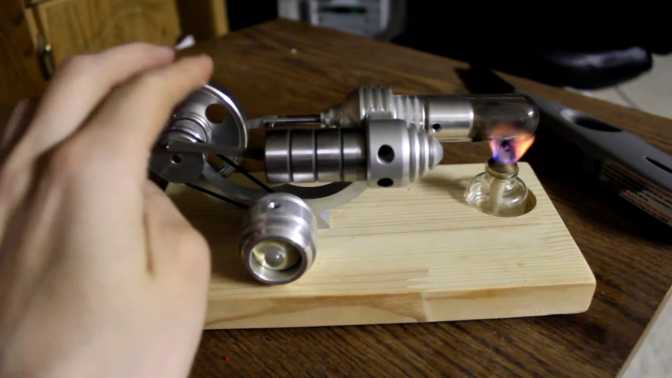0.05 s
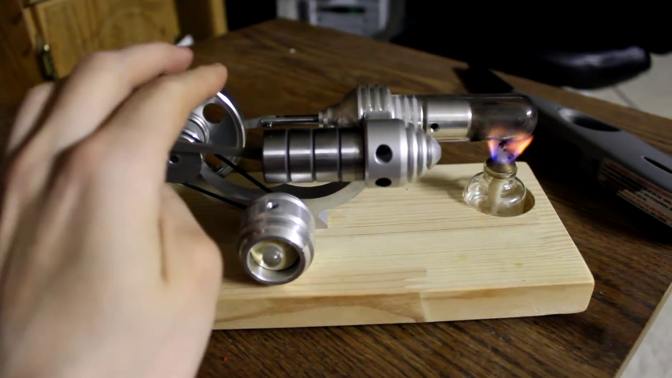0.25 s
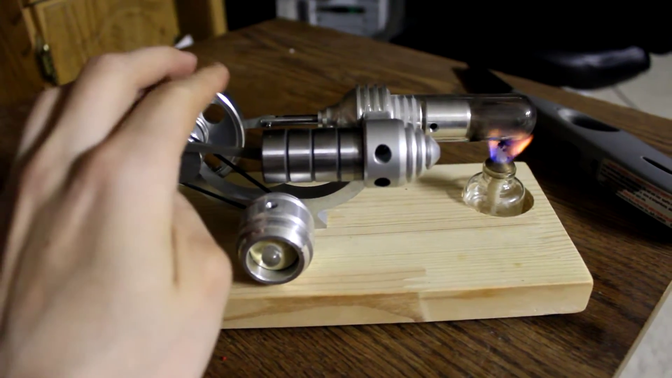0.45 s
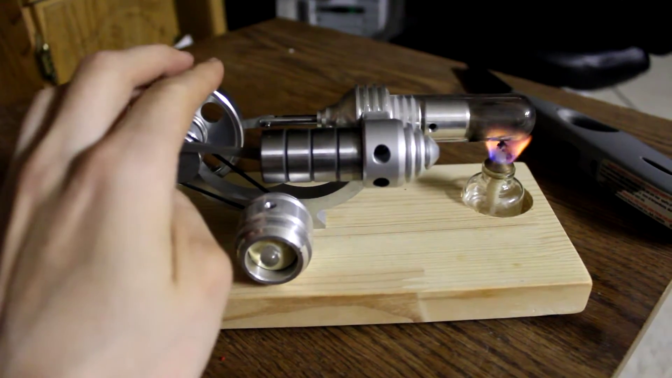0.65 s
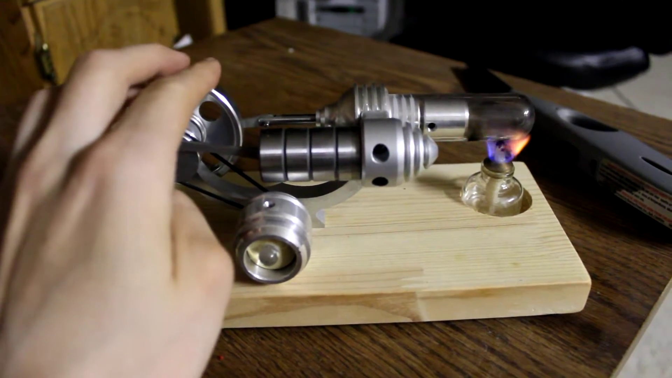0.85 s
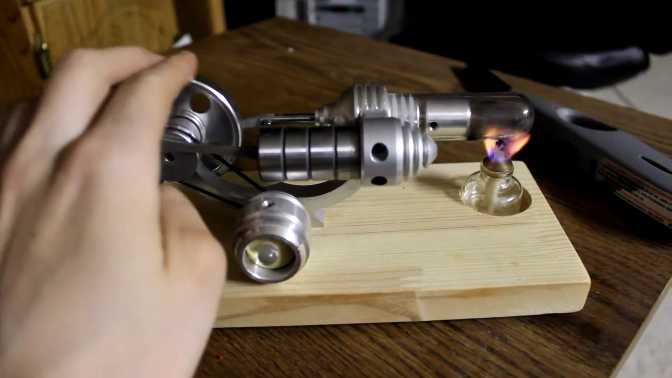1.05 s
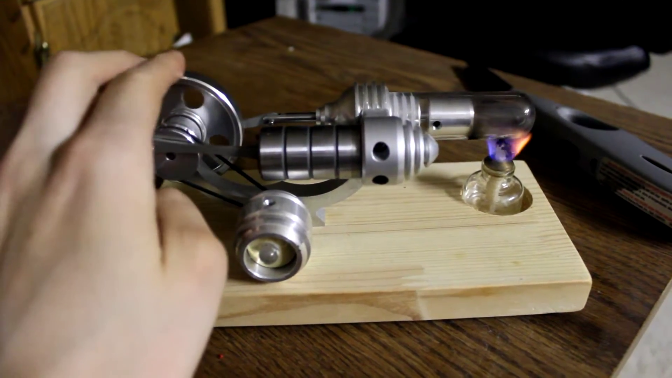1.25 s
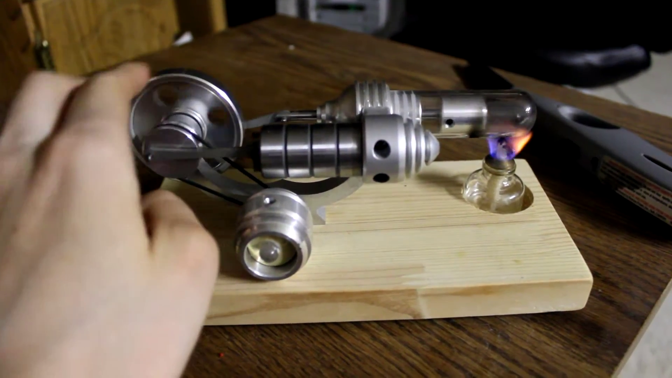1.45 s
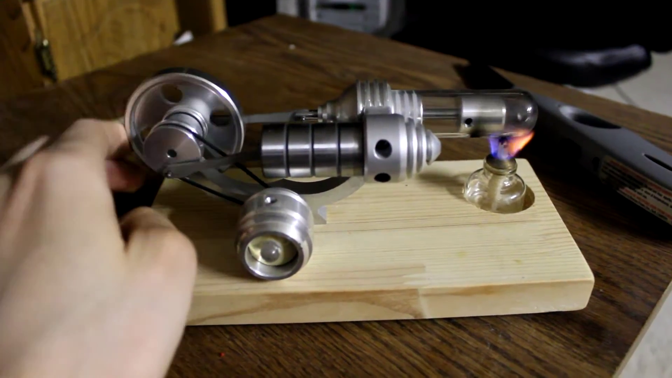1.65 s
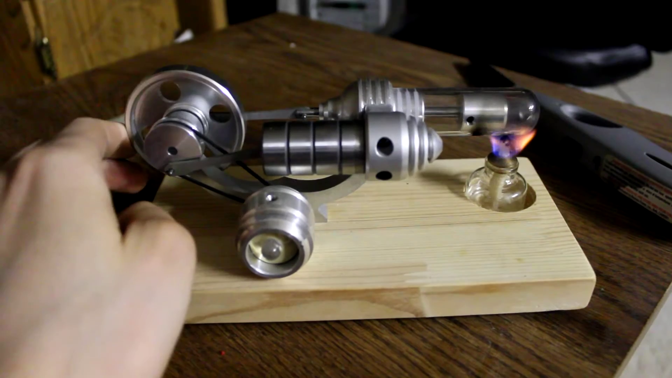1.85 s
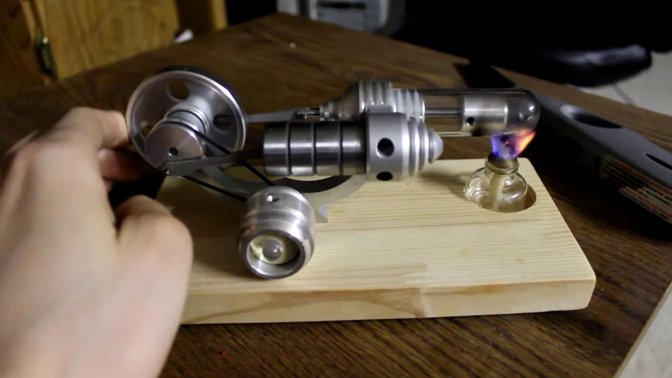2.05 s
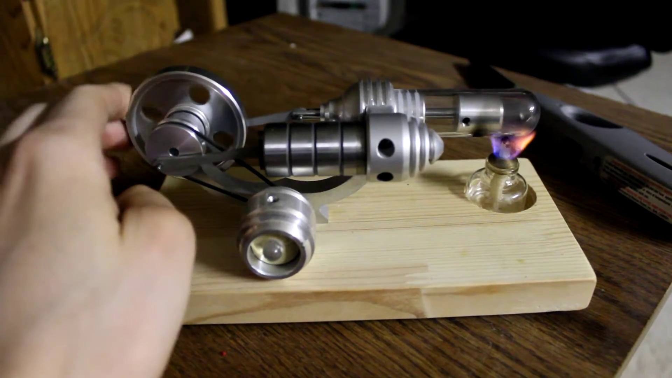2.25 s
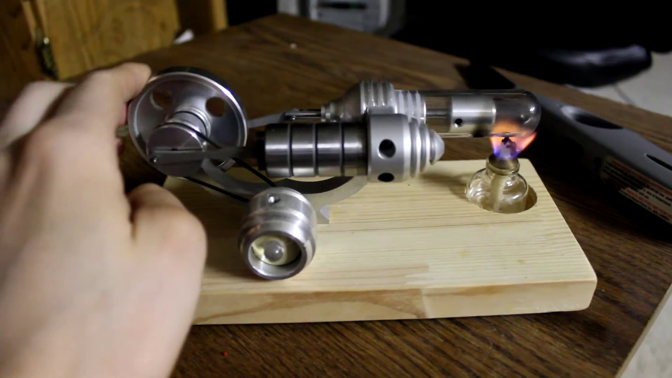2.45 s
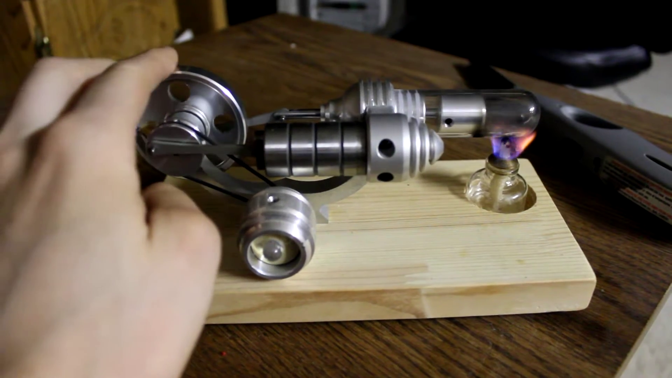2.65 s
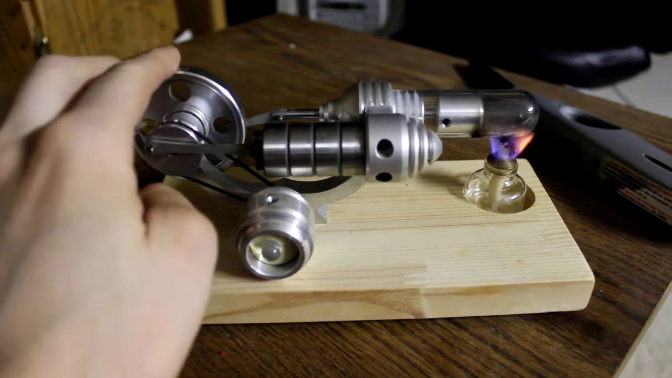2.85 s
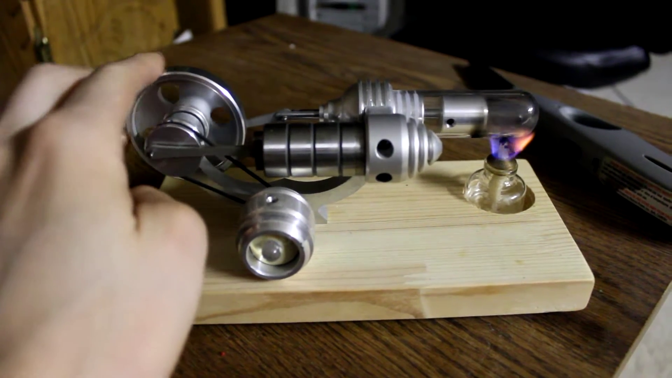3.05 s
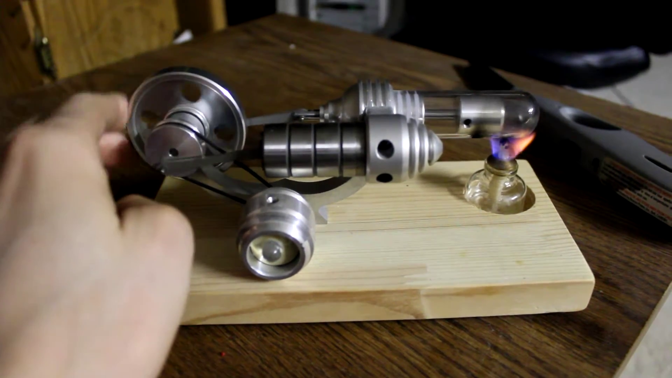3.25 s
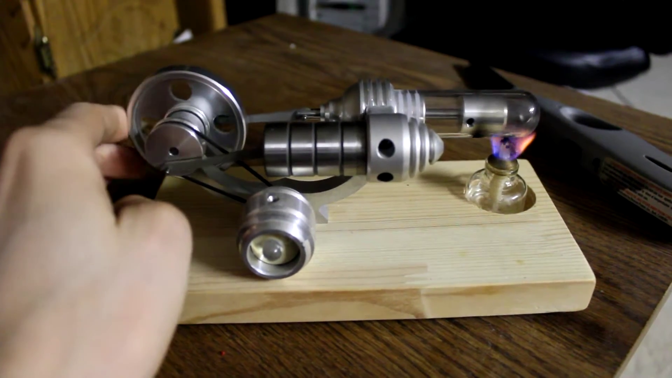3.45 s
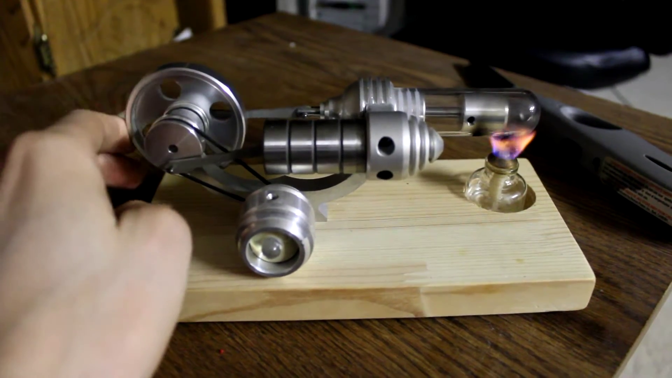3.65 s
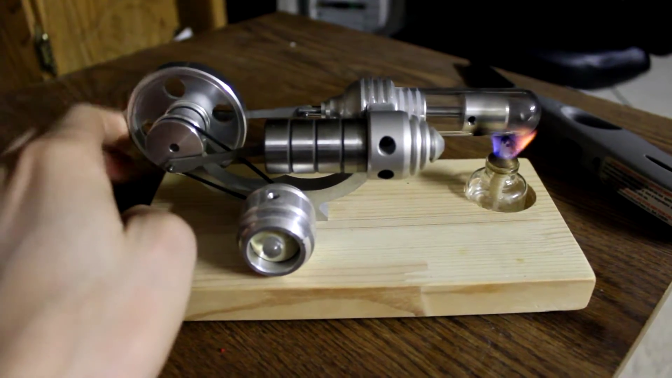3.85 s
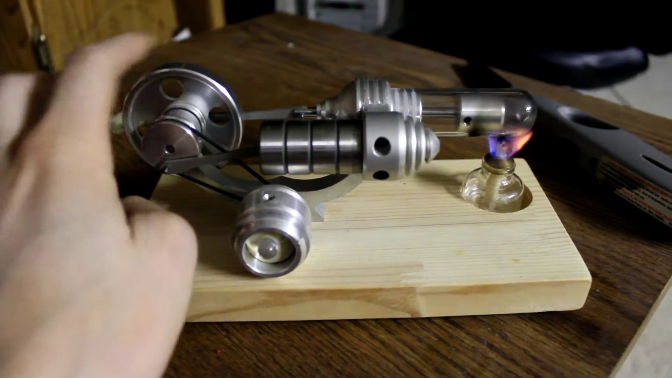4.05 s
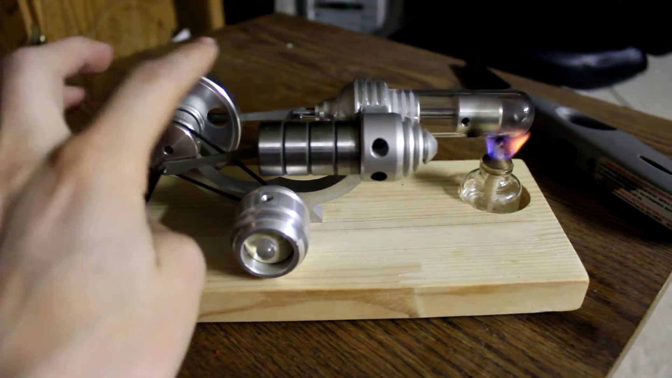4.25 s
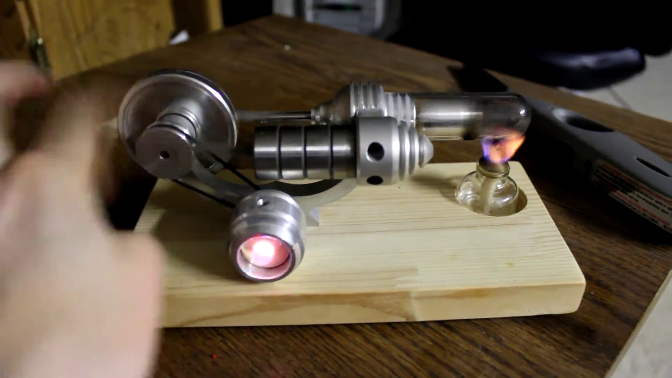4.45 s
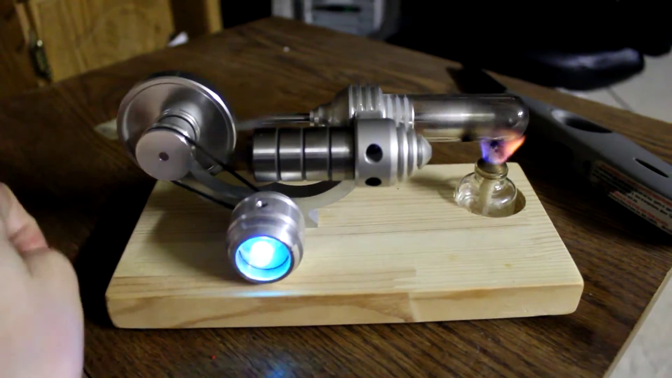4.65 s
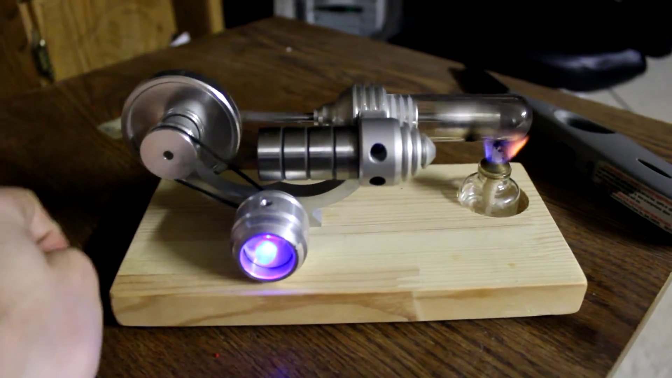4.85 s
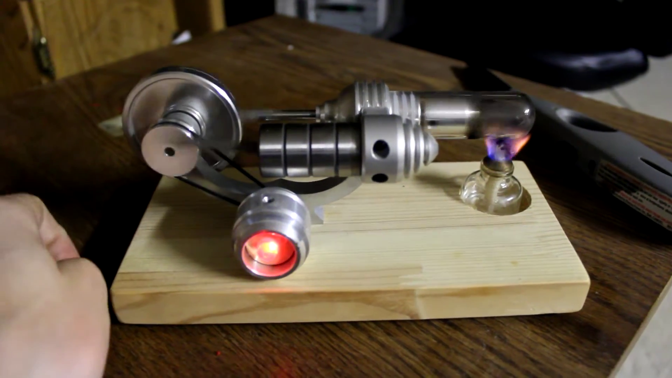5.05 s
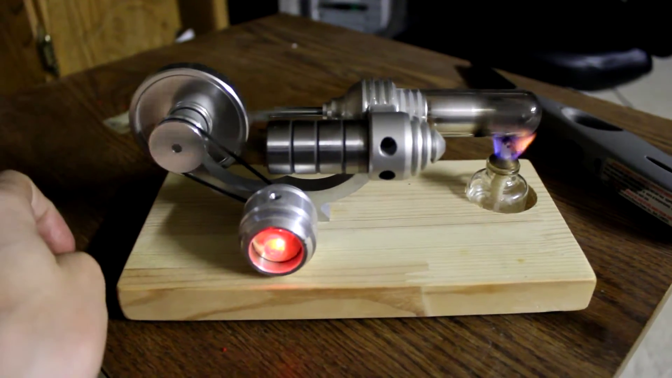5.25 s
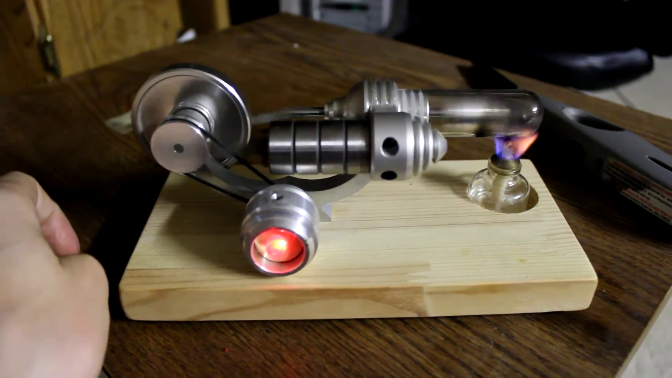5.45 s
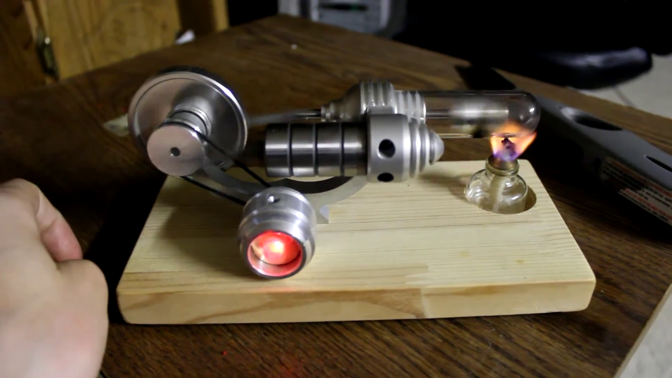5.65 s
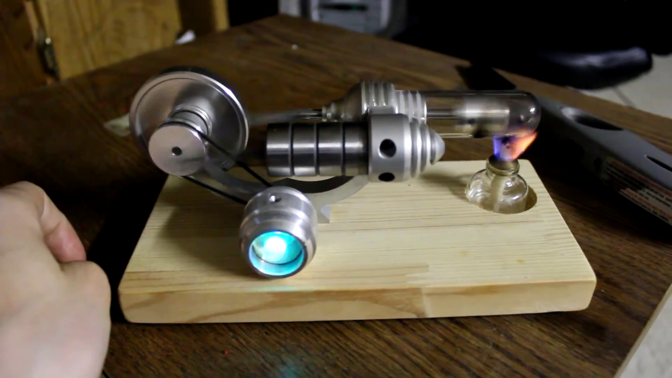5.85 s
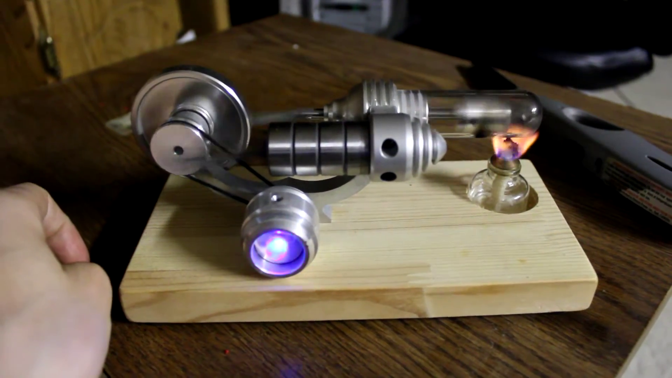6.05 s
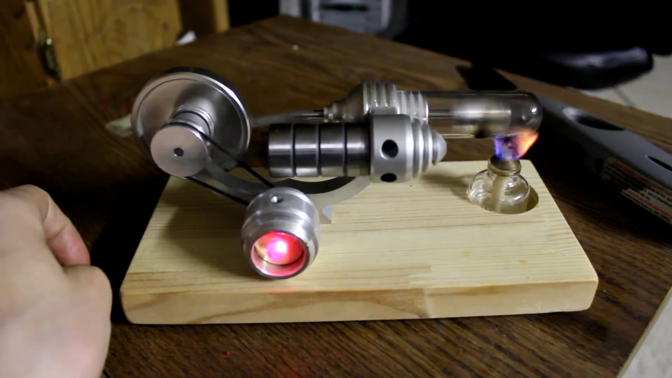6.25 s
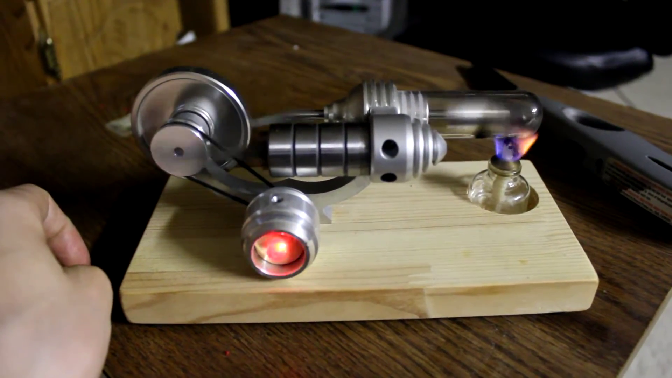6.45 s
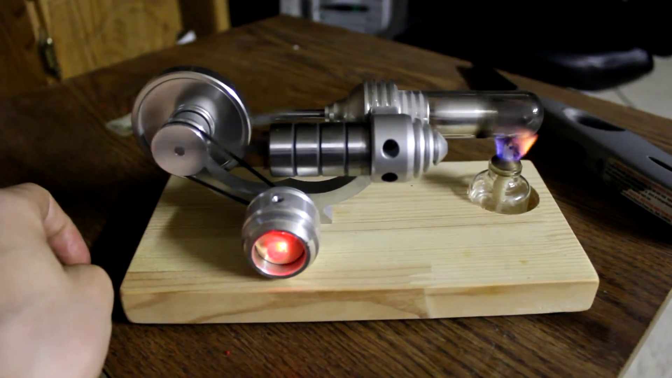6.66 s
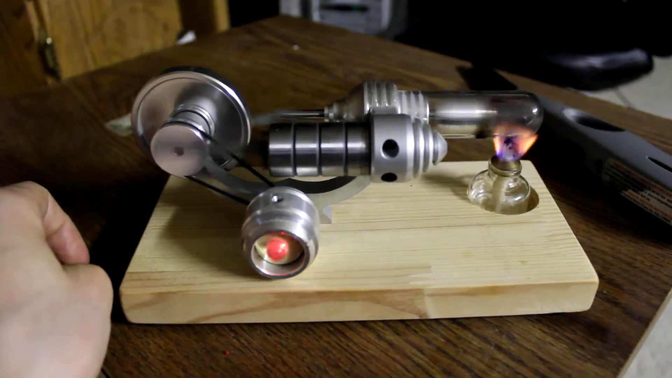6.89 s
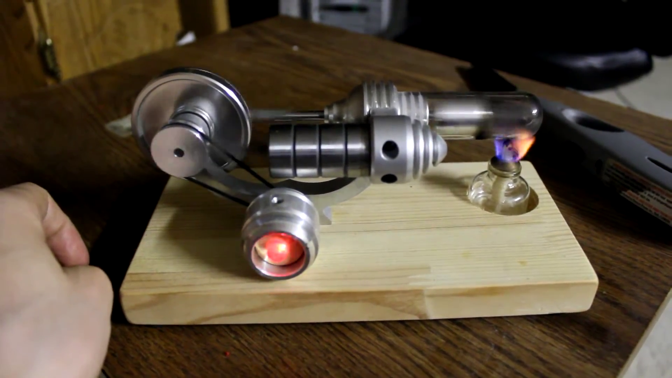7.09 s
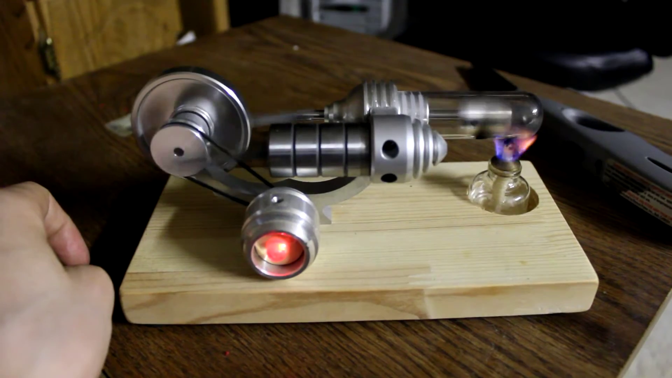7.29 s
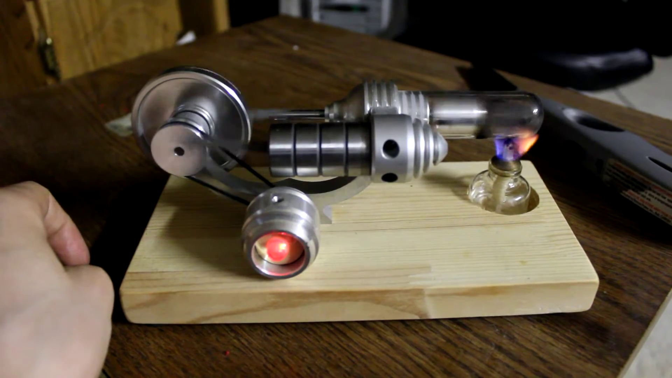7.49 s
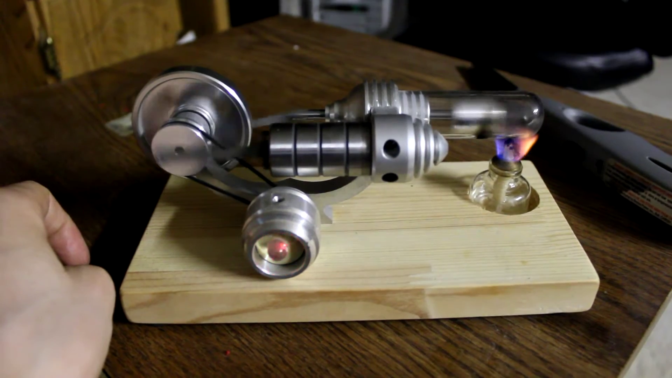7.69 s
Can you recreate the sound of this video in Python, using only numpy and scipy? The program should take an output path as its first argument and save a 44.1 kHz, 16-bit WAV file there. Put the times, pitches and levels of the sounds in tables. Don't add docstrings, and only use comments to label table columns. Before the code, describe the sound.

Light metallic ticks and finger rubs as a small engine's wheel is nudged, then a sudden loud, fast, steady metal clatter with faint singing squeal.

```python
import sys
import numpy as np
from scipy import signal
from scipy.fft import rfft, irfft
from scipy.io import wavfile
from scipy.ndimage import uniform_filter1d

SR = 44100
rng = np.random.default_rng(int(sys.argv[2]) if len(sys.argv) > 2 else 0)


def generate_wav(sig):
    pcm = np.round(np.clip(np.atleast_2d(sig).T, -1, 1) * 32767).astype(np.int16)
    wavfile.write(sys.argv[1], SR, pcm)


def volts(x):
    e = np.asarray(x, float) / 20
    return 10 ** e


N = 340669


def rms_one(x):
    return x / np.sqrt(np.mean(x ** 2) + 1e-20)


def in_time(rows):
    return np.interp(np.arange(N) / SR, *np.transpose(rows))


def drift(hz):
    lowpass = signal.butter(2, hz, fs=SR, output="sos")
    wander = signal.sosfilt(lowpass, rng.standard_normal(N + SR))
    return rms_one(wander[SR:])


def above(x, hz, order=4):
    return signal.sosfilt(signal.butter(order, hz, "high", fs=SR, output="sos"), x)


def below(x, hz, order):
    return signal.sosfilt(signal.butter(order, hz, fs=SR, output="sos"), x)


def ring(force, hz, t60):
    radius = volts(-60 / (t60 * SR))
    angle = 2 * np.pi * hz / SR
    resonator = [1, -2 * radius * np.cos(angle), radius * radius]
    return signal.lfilter([0, np.sin(angle)], resonator, force + 1e-18)


def chatter(at_s, spread_s, count=10):
    late = -np.log(1 - .995 * rng.random((len(at_s), count)))
    late -= late.min(axis=1, keepdims=True)
    closing = np.minimum(late / 0.77 + 0.38, 1)
    size = closing * np.exp(-late / 4.1)
    size /= np.sqrt(np.sum(size ** 2, axis=1, keepdims=True))
    contact_s = at_s[:, None] + late * spread_s
    return np.minimum((contact_s * SR).astype(int), N - 1), size


def struck(modes, at, size, blow_db, friction, uneven_db, split=0., near_hz=None):
    out = np.zeros(N)
    for hz, mode_db, t60 in modes:
        aim_db = 0 if near_hz is None else -30.0 * np.abs(np.log(hz / near_hz))
        for twin_hz in {hz * (1 - split), hz * (1 + split)}:
            luck = rng.standard_normal((len(at), at.shape[1] + 1))
            blow = volts(blow_db + aim_db + uneven_db * luck[:, 0])[:, None]
            strength = blow * size * np.sign(luck[:, 1:])
            force = np.bincount(at.ravel(), strength.ravel(), N) + friction
            out += volts(mode_db) * ring(force, twin_hz, t60)
    return out


# pitch in Hz, level in dB per Hz.
AIR_COLOUR = [(25, -31), (100, -17.5), (200, -14), (450, -11.5), (930, -12), (2150, -14.5), (8700, -24.5),
              (15800, -42)]
# the pitch of each tone in Hz, then the level of each in dB.
HUM_HZ = [119.8, 447]
HUM_DB = [-65, -71]


def background():
    hz = np.arange(N // 2 + 1) * SR / N
    points_hz, level_db = np.transpose(AIR_COLOUR)
    colour = volts(np.interp(np.log(hz + 1), np.log(points_hz), level_db))
    air = volts(-55) * rms_one(irfft(rfft(rng.standard_normal(N)) * colour, N))
    for hum_hz, hum_db in zip(HUM_HZ, HUM_DB):
        level = volts(hum_db + 0.66 * drift(4.9))
        wavering_hz = hum_hz * (1 + 0.0024 * drift(6.3))
        air += level * np.sin(2 * np.pi * np.cumsum(wavering_hz) / SR)
    return air


def room(x):
    t60_s, level_db = 0.13, -15
    t = np.arange(SR // 2) / SR
    echoes = rng.standard_normal((2, len(t))) * (t > .003)
    dull = signal.lfilter([.45], [1, -.55], echoes[0]) * volts(-60 * t / t60_s)
    bright = 0.089 * echoes[1] * volts(-60 * t / (0.62 * t60_s))
    tail = dull + bright
    tail /= np.sqrt(np.sum(tail ** 2))
    return volts(level_db) * signal.fftconvolve(x, tail)[:N]


# time in seconds, level in dB, swell in seconds, fade (60 dB) in seconds.
RUBS = [(.17, -49, 0.012, 0.13), (.345, -40.5, 0.0046, 0.11), (1.046, -39, 0.008, 0.13),
        (1.069, -47, 0.0074, 0.31), (2.08, -51, 0.052, 0.14), (2.821, -47.5, 0.0089, 0.11),
        (3.045, -37, 0.0068, 0.28), (3.085, -58, 0.012, 0.32), (3.26, -47, 0.0093, 0.27),
        (3.88, -38, 0.012, 0.12), (4.06, -42.5, 0.019, 0.2), (4.355, -40, 0.0076, 0.072),
        (4.4, -33.5, 0.0042, 0.11)]


def fingers():
    t, shape = np.arange(N) / SR, np.zeros(N)
    for s, level_db, swell, t60 in RUBS:
        shape += volts(level_db + np.where(t < s, 9.5 * (t - s) / swell, -60 * (t - s) / t60))
    grain = shape * rng.standard_normal(N) * volts(1.5 * drift(240) + 5.5)
    dull = below(above(grain, 360), 2400, order=4)
    return dull + 0.023 * ring(dull, 1540, 0.0059)


# time in seconds, blow in dB, pitch in Hz.
TICKS = [(0.084, -46, 4920), (0.1535, -37, 5320), (0.4683, -39, 5190), (0.5967, -37.5, 3360),
         (1.1396, -41, 3420), (1.264, -41, 3350), (1.7035, -41, 4880), (1.8537, -36, 4930),
         (1.9096, -45, 4800), (2.826, -36, 5270), (3.0864, -38, 3750), (3.824, -36.5, 4330),
         (3.8744, -34, 4120), (3.905, -38, 5920), (4.3474, -35, 3770)]
# time in
# seconds, blow in dB, pitch in Hz, frame share in dB, pin share in dB.
CLICKS = [(0.1745, -35.5, 5230, -6, -10), (0.3384, -32.5, 5910, -16, -21), (0.3486, -35, 3810, -4, -15),
          (0.9991, -39, 5000, 7, -11), (1.0604, -31, 3990, -6, -18), (1.0665, -17, 3900, -3.5, -9),
          (1.4137, -24, 4350, -10, -14), (1.6646, -35.5, 4940, -12, -24), (2.0941, -23.5, 4770, -5.5, -14),
          (2.4144, -44, 4240, -5, 2), (2.7955, -29, 5170, -11, -9), (2.9272, -25.5, 4960, -4.5, -18),
          (3.2106, -14.5, 4900, -12, -18), (3.2484, -32, 5200, -11, 4), (3.2585, -17, 5060, -9, -15),
          (3.4715, -36.5, 3830, -3.5, -18), (3.8821, -30.5, 4940, -1, -9), (4.3964, -24, 4000, -9, -12),
          (4.4107, -15.5, 4970, -7, -12), (4.4425, -7, 5000, -11.5, -19), (4.488, -4.5, 3770, -7.5, -11)]


def handling():
    hand_damping = .55
    tick_frame_db, tick_pin_db = -7, -18
    touches = sorted(CLICKS + [(*row, tick_frame_db, tick_pin_db) for row in TICKS])
    s, level, hz, frame, pin = np.transpose(touches)
    at, size = chatter(s, .0007)
    # part, share in dB, pitch in Hz the touch favours
    parts = [(FRAME, frame + 7.9, 1520), (CYLINDER, 6.0, hz), (PINS, pin + .8, None), (SPRING, pin + 7, 10200)]
    out = np.zeros(N)
    for modes, share_db, near_hz in parts:
        damped = np.array(modes) * [1, 1, hand_damping]
        out += struck(damped, at, size, level + share_db, 0, uneven_db=2.5, near_hz=near_hz)
    return out


# time in seconds, level in dB, length in seconds.
SQUEAKS = [
    (0.144, -62, .16),
    (3.77, -64, .005),
    (3.873, -55.5, .19),
]


def squeaks():
    rise_db_s, sag_db_s, release_db_s = 900, 50, 350
    t, level = np.arange(N) / SR, 0
    for s, db, length in SQUEAKS:
        fall = sag_db_s * (t - s) + release_db_s * np.maximum(t - s - length, 0)
        level = level + volts(db - np.where(t < s, rise_db_s * (s - t), fall))
    return level


USUAL_BLOW_DB = -12
# time in seconds, blow in dB, frame share in dB, rebound delay in ms, rebound share in dB.
FLICK = [
    (4.3538, -35.5, -8, 14, -24),
    (4.405, -30.5, 4, 7.5, -1),
    (4.4411, -14.5, -3.5, 3.7, -22),
    (4.4874, -8.5, -6, 11.0, -31),
    (4.5207, -5.5, -15, 8.8, -13),
    (4.5452, -11.5, -2.5, 14, -1.5),
    (4.602, -11.5, -4, 5.9, -5),
]
# time in seconds, blow in dB, rebound delay in ms.
INWARD = [(4.6298, -10.5, 14.7), (4.7142, -9, 14.8), (4.7993, -12.5, 14.5), (4.8849, -13.5, 11.6),
          (4.97, -16.5, 13.2), (5.0576, -10.5, 13.7), (5.1476, -14.5, 15.6), (5.24, -15.5, 14),
          (5.3322, -17, 12.2), (5.4259, -17.5, 10.6), (5.5191, -17.5, 13.2), (5.615, -11, 11.8),
          (5.7108, -14, 14), (5.809, -12.5, 15.6), (5.9082, -12, 12.3), (6.009, -13.5, 12.7),
          (6.1097, -10.5, 13.8), (6.2106, -10.5, 15.8), (6.3138, -12.5, 12.8), (6.4179, -11, 10.6),
          (6.5228, -10.5, 15.4), (6.63, -17, 13.8), (6.74, -13.5, 10.1), (6.8567, -12.5, 12),
          (6.976, -15.5, 15), (7.0974, -20.5, 10.8), (7.2191, -18.5, 13), (7.347, -13, 12.6),
          (7.4825, -14, 13.1), (7.6198, -14, 10.5)]
# time in seconds, blow in dB, rebound delay in ms.
OUTWARD = [(4.6838, -13, 9.4), (4.7664, -10.5, 7.8), (4.849, -7, 12.6), (4.9321, -11, 9.5),
           (5.0185, -11.5, 16.3), (5.106, -12, 14.3), (5.196, -8, 11), (5.2878, -12.5, 15.6),
           (5.38, -8.5, 11), (5.472, -15.5, 13), (5.567, -12.5, 14.6), (5.6628, -12, 12.3),
           (5.7601, -13, 12.5), (5.8581, -13, 13.7), (5.9573, -13.5, 14.2), (6.0592, -13, 11.4),
           (6.16, -14, 7.4), (6.2617, -7.5, 12.6), (6.3645, -13, 14), (6.4675, -12.5, 12.6),
           (6.5744, -11, 6.6), (6.6826, -11.5, 12), (6.791, -8.5, 16), (6.913, -6.5, 12),
           (7.0338, -7.5, 5.2), (7.1538, -18.5, 5.7), (7.2787, -15, 10), (7.405, -9.5, 9.2),
           (7.548, -10.5, 5.6), (7.678, -10.5, 13)]
# share at a usual blow in dB, dB lost per dB of harder blow.
INWARD_SHARES = [
    (-7, 0.39),
    (-11.5, 0.27),
    (-4, 0.33),
]
OUTWARD_SHARES = [
    (-4, 0.83),
    (-8.5, 0.76),
    (-11, 0.46),
]


def stroke_ends():
    flick_pin_db = -11
    rows = [(s, blow, frame, flick_pin_db, ms, rebound) for s, blow, frame, ms, rebound in FLICK]
    for ends, shares in ((INWARD, INWARD_SHARES), (OUTWARD, OUTWARD_SHARES)):
        for s, blow, ms in ends:
            frame, pin, rebound = (db - loss * (blow - USUAL_BLOW_DB) for db, loss in shares)
            rows.append((s, blow, frame, pin, ms, rebound))
    return np.transpose(sorted(rows))


# time in seconds, level in dB.
SING_LEVEL = [
    (4.45, -60),
    (5.05, -33),
    (5.2, -63),
    (5.6, -36.5),
    (6.0, -39),
    (6.7, -44),
    (7.0, -30),
    (7.1, -54),
    (7.72, -35),
]
# time in seconds, pitch in Hz.
SING_HZ = [(.3, 5960), (3.75, 6150), (3.89, 6100), (3.95, 5970), (4.2, 5950), (4.5, 5918)]


def singing():
    s = stroke_ends()[0]
    next_end_s = 2 * s[-1] - s[-2]
    strokes = np.interp(np.arange(N) / SR, np.append(s, next_end_s), np.arange(len(s) + 1))
    swell = np.sin(2 * np.pi * (strokes - .16))
    pitch_hz = in_time(SING_HZ) + 7.0 * drift(30)
    tone = np.sin(2 * np.pi * np.cumsum(pitch_hz) / SR)
    running = strokes > 2
    level = volts(in_time(SING_LEVEL)) * running + squeaks()
    return level * volts(3.2 * drift(23)) * swell * tone


def sliding_db():
    usual_strokes_per_s, speed_power = 19.6, 1.33
    s, t = stroke_ends()[0], np.arange(N) / SR
    speed = np.interp(t, s[1:-1], 2 / (s[2:] - s[:-2]))
    speed = uniform_filter1d(speed, size=SR // 4)
    spin_up_db = np.interp(t, (4.27, 4.5), [-44, 0])
    return -50 + speed_power * 20 * np.log10(speed / usual_strokes_per_s) + spin_up_db


def rattle():
    s, blow = stroke_ends()[:2]
    shake = np.bincount(((s + .002) * SR).astype(int), volts(blow - 37.0), N)
    fade = volts(-60 / (.06 * SR))
    shiver = signal.lfilter([1], [1, -fade], shake) * volts(1.7 * drift(350))
    sliding = volts(sliding_db() - 14.0) * volts(4 * drift(80))
    return (sliding + shiver) * rng.standard_normal(N)


# time in seconds, push in dB.
NUDGES = [
    (.351, -15.5),
    (1.05, -29),
    (1.068, -16),
    (1.415, -29),
    (3.05, -32),
    (3.26, -38),
    (3.885, -16),
]
# pitch in Hz, level in dB, fade (60 dB) in seconds.
BOARD = [(553, -24.5, 0.061), (594, -27.5, 0.065), (641, -31, 0.032)]
# pitch in Hz, level in dB, fade (60 dB) in seconds.
TABLE = [(136, -48, 0.26), (228, -43.5, 0.16), (294.7, -32.5, 0.14)]


def board(friction):
    s, blow = stroke_ends()[:2]
    at, size = ((s[:, None] + 0.001) * SR).astype(int), np.ones((len(s), 1))
    push_db = 0.44 * (blow + 15) - 3.0
    thump = struck(BOARD, at, size, push_db, 1.4 * friction, uneven_db=0.0)
    nudge_s, nudge_db = np.transpose(NUDGES)
    nudge_at = (nudge_s[:, None] * SR).astype(int)
    nudge = struck(BOARD, nudge_at, size[:len(NUDGES)], nudge_db, 0, uneven_db=1.5)
    inward_db = np.minimum(np.interp(s, s[1::2], blow[1::2]) - USUAL_BLOW_DB, 0)
    outward = np.arange(len(s)) % 2 == 0
    rock_db = -1.0 + 0.83 * inward_db - 6.5 * outward
    rock = struck(TABLE, at, size, rock_db, 1.8 * friction, uneven_db=1.0)
    return above(thump + nudge, 568, order=6) + below(rock, 380, order=2)


def pin_flips():
    start, end = np.array(INWARD)[:, 0], np.array(OUTWARD)[:, 0]
    share_of_stroke = .72
    at, size = chatter(start + share_of_stroke * (end - start), 0.00091)
    return struck(PINS, at, size, np.full(len(start), -35), 0, uneven_db=4.0)


# pitch in Hz, level in dB, fade (60 dB) in seconds.
FRAME = [(952.5, -18.5, 0.047), (1015, -22.5, 0.038), (1276, -16.5, 0.053), (1568, -17, 0.066),
         (1756, -9, 0.025), (1900, -10, 0.011), (2162, -7.5, 0.023), (2280, -19.5, 0.093),
         (2792, -31, 0.11), (1440, -12.5, 0.017), (3170, -27.5, 0.054)]
CYLINDER = [(3600, -41, 0.06), (3708, -11.5, 0.023), (3802, -11.5, 0.027), (4150, -17.5, 0.029),
            (4440, -18, 0.016), (4920, -8.5, 0.014), (5160, -12.5, 0.022), (5540, -18.5, 0.016),
            (5760, -17, 0.022), (6080, -24.5, 0.056)]
PINS = [(6815, -6, 0.018), (7073, -6, 0.022), (7510, -10, 0.0093), (8220, -17, 0.02)]
SPRING = [(9270, -19.5, 0.018), (10010, -11.5, 0.011), (10400, -9.5, 0.007), (11900, -10, 0.0028),
          (14000, -12.5, 0.0092), (14400, -12, 0.0035)]


def linkage(friction):
    s, blow, frame, pin, delay_ms, rebound = stroke_ends()
    parts = [chatter(s, .0014), chatter(s + delay_ms / 1000, 0.0012)]
    at, size = (np.concatenate(p) for p in zip(*parts))
    level = np.concatenate([blow + 4.53, blow + rebound + 5.73])
    frame_db = level + np.concatenate([frame, frame - 3.0])
    pin_db = level + np.concatenate([pin + 3.0, pin + 7.0])
    is_rebound = np.arange(len(at)) >= len(s)
    spring_db = pin_db - 4.0 * is_rebound
    return (struck(FRAME, at, size, frame_db, friction, uneven_db=2.0)
            + struck(CYLINDER, at, size, level, friction, uneven_db=2.0, split=.011)
            + struck(PINS, at, size, pin_db, 0.05 * friction, uneven_db=1.5)
            + struck(SPRING, at, size, spring_db, 0.05 * friction, uneven_db=2.0))


def scene():
    friction = rattle()
    metal = above(linkage(friction) + handling(), 686)
    engine = metal + board(friction) + singing() + fingers() + pin_flips()
    engine = above(engine, 129)
    return (engine + room(engine) + background())[None]


def band_limit(x):
    return signal.sosfilt(signal.butter(12, 15970, fs=SR, output="sos"), x)


def record(dry):
    rounded = 1.2 * np.tanh(dry / 1.2)
    mix = signal.sosfilt(signal.cheby2(10, 60, 16400, fs=SR, output="sos"), rounded)
    return band_limit(mix)


dry = scene()
out = record(dry)
generate_wav(out)
```